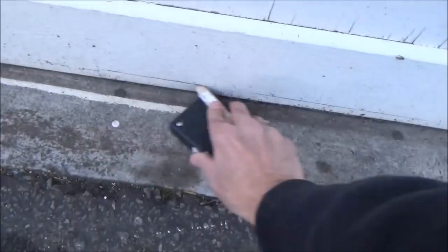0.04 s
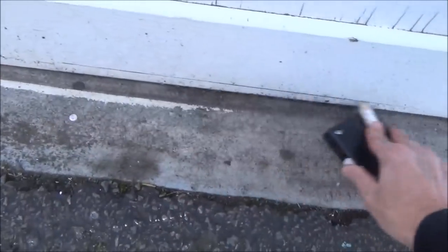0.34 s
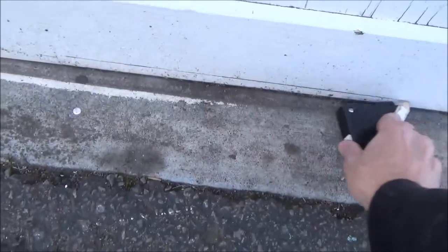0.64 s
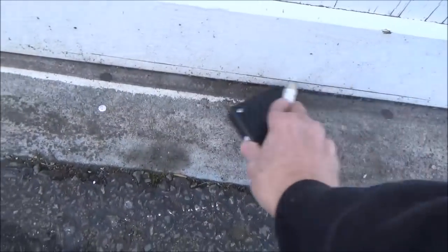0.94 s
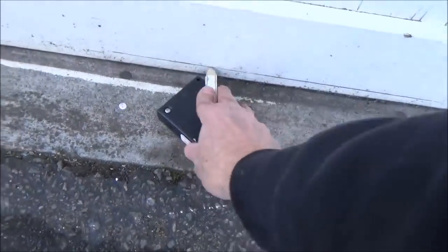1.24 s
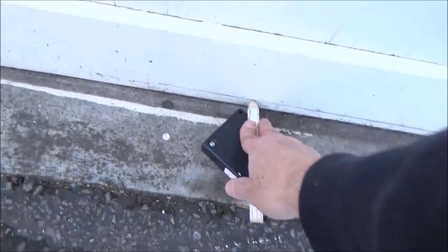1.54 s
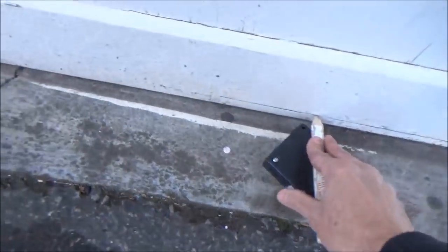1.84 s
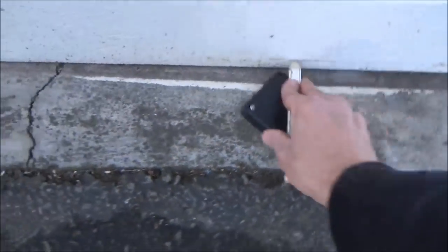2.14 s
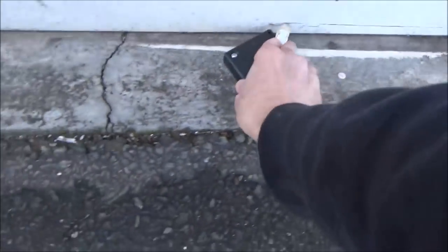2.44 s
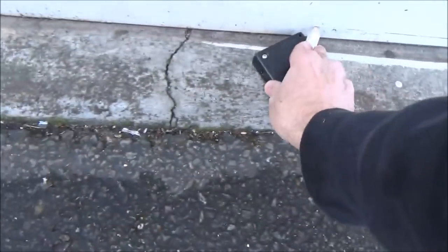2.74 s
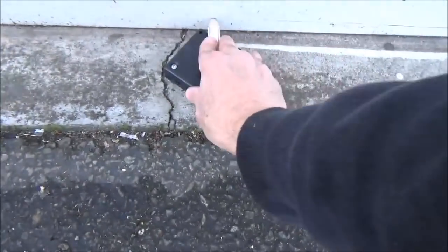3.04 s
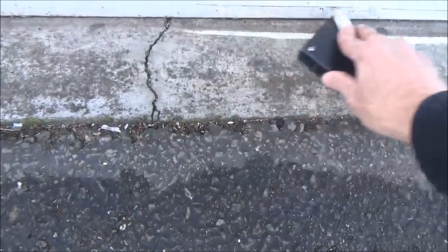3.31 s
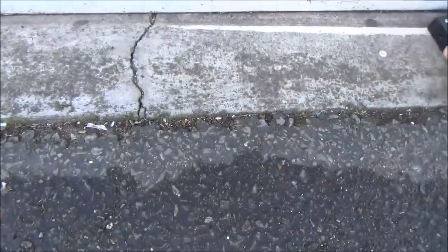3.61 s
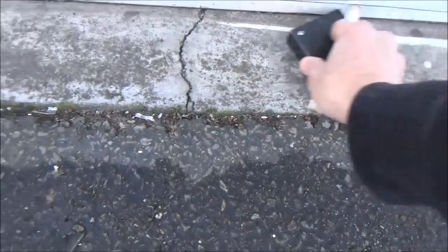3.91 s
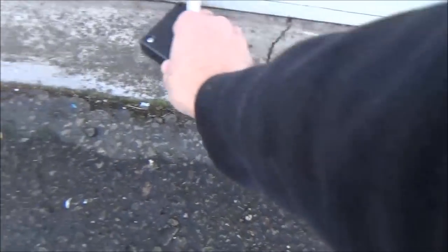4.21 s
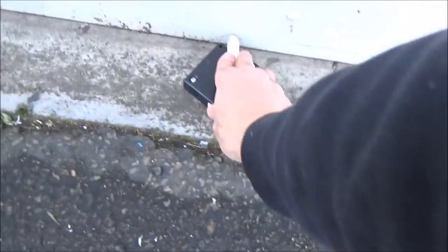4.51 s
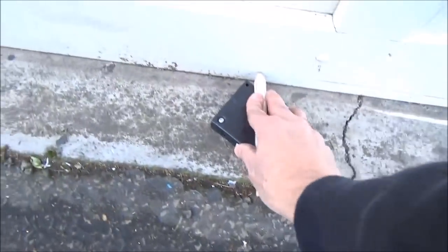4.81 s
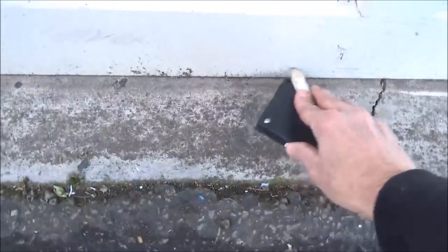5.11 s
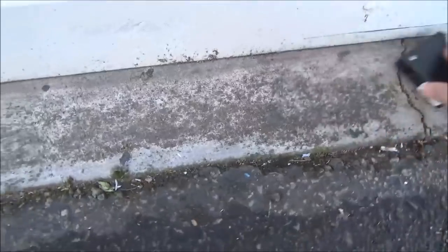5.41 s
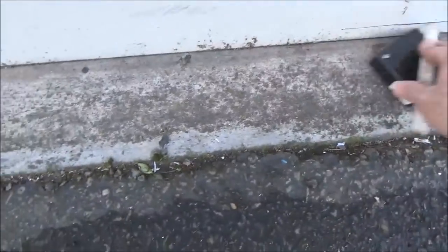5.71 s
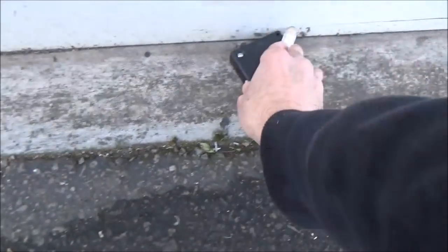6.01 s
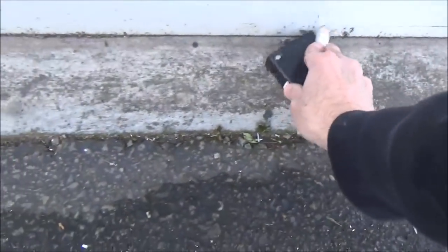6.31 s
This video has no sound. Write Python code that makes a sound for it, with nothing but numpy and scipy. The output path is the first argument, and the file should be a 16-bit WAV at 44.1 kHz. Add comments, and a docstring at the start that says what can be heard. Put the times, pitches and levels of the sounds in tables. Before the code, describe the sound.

Gritty scrapes of plastic on concrete move left and right, with small knocks and hoarse squeaks, over street rumble and a passing engine.

```python
"""A hollow plastic case, a pencil held against it, is dragged to and fro over rough concrete.
It slides left and right before a stereo microphone, at the foot of a garage door that reflects it.
Sand grains catch its edge and ring the case; at the turns it rocks, knocks and crunches loose grit.
Farther off, the street outside rumbles, and an engine swells and fades around the first long pause."""
import sys
import numpy as np
from scipy import signal
from scipy.fft import rfft, irfft, next_fast_len
from scipy.io import wavfile

SR = 44100
rng = np.random.default_rng(int(sys.argv[2]) if len(sys.argv) > 2 else 0)


def transcribe(u):
    """Save the signal u as a 16-bit wav file named by the first command-line argument.

    u: samples, shape (n,) or (channels, n), limited to [-1, 1]; the rate is SR.
    q: integer samples, one column per channel.
    """
    v = np.clip(np.atleast_2d(u).T, -1, 1)
    q = np.round(v * 32767).astype(np.int16)
    wavfile.write(sys.argv[1], SR, q)


N = 280035
TIME = np.arange(N) / SR


def amp(db):
    """Decibels to gain."""
    return 10 ** (np.asarray(db) / 20)


def unit_rms(x):
    """Scales to rms 1."""
    return x / np.sqrt(np.mean(x ** 2) + 1e-20)


def gain_at(spectrum, hz):
    """Gain of a (frequency [Hz], level [dB]) curve, joined on a log axis."""
    corners, db = np.transpose(spectrum)
    return amp(np.interp(np.log(hz + 1), np.log(corners + 1), db))


def add(mix, s, sound):
    """Mixes a sound in at time s."""
    part = mix[..., max(round(s * SR), 0):][..., :sound.shape[-1]]
    part += sound[..., :part.shape[-1]]


def wander(hz):
    """Slow random drift of rms 1, up to about hz."""
    step = 64
    count = next_fast_len(N // step + 2)
    f = np.fft.rfftfreq(count, step / SR)
    slow = irfft(rfft(rng.standard_normal(count)) / (1 + (f / hz) ** 4), count)
    return unit_rms(np.interp(np.arange(N) / step, np.arange(count), slow))


def hump(s, half_width):
    """A bell curve of height 1 around time s."""
    return np.exp(-np.minimum(((TIME - s) / half_width) ** 2, 20))


def resonate(x, hz, width):
    """A resonance of gain 1 that follows the pitch hz."""
    turn = np.exp(2j * np.pi * np.cumsum(hz * np.ones(len(x))) / SR)
    pole = np.exp(-np.pi * width / SR)
    return 2 * (turn * signal.lfilter([1 - pole], [1, -pole], x / turn + 1e-18)).real


def place():
    """Where the case is, seen from the microphone: positive is left."""
    # its path: (time [s], leftward position [dB])
    path = [(0.0, 2), (0.5, -5), (1.15, 0.5), (1.38, -4.5), (1.95, -2), (2.39, -1.5), (2.55, -2),
            (3.08, -0.5), (3.62, -6.5), (4.35, 1.5), (5, 0.5), (5.58, -6), (6.05, 1)]
    return np.interp(TIME, *np.transpose(path))


def hand(hollow_from_db=-2.5):
    """Each push speeds up, holds and slows; returns speed and the levels of (boom, rasp, fizz)."""
    # pushes and shifts of grip: (start [s], length [s], speeding up [s], slowing [s], edge rasp [dB],
    # swell over the push [dB], case boom re rasp [dB], sand fizz re rasp [dB])
    strokes = [(0.0, 0.48, 0.001, 0.12, -21.5, 1, -5.5, 1), (0.46, 0.079, 0.025, 0.031, -37, -1, 3.5, 2),
               (0.518, 0.19, 0.046, 0.14, -23.5, -0.5, 1, 4.5), (0.593, 0.53, 0.21, 0.042, -24.5, 2, 0, 1),
               (1.348, 0.089, 0.028, 0.044, -46, -3, 8.5, -4.0),
               (1.505, 0.19, 0.025, 0.159, -38.5, 5, 2, 0.5), (1.956, 0.24, 0.11, 0.11, -21.5, -2, -0.5, 3),
               (2.16, 0.3, 0.094, 0.2, -24, -5, -1.5, 1.5),
               (2.477, 0.56, 0.27, 0.14, -26.5, 9.5, -1.5, -0.0),
               (3.018, 0.69, 0.21, 0.203, -21.5, 1, -3.5, 1),
               (3.624, 0.72, 0.16, 0.12, -22, -0.5, -3, -1.5), (4.63, 0.16, 0.033, 0.087, -35.5, -3, 1, -2),
               (5.018, 0.548, 0.15, 0.088, -25.5, 4, -4, 4.0),
               (5.553, 0.51, 0.1, 0.083, -22.5, -3, -4.5, -0.5)]
    # the edge bites deeper (+) or skips (-): (time [s], half width [s], bite [dB])
    catches = [(0.038, 0.21, 2), (1.05, 0.047, 1), (2.792, 0.02, 4), (2.874, 0.04, 5), (3.452, 0.12, 0),
               (3.625, 0.026, -12.5), (4.178, 0.027, -8.5), (4.275, 0.016, 5.0), (5.154, 0.075, 5.5),
               (5.458, 0.044, 4)]
    # power of speed that each level follows: (boom, rasp, fizz)
    speed_power = (1.0, 1.67, 1.58)
    # response to a bite: (boom, rasp, fizz) [dB/dB]
    catch_share = (1.32, .86, -0.17)
    speeds, level = np.zeros(N), np.zeros((3, N))
    for start, length, rise, fall, db, swell_db, boom_db, fizz_db in strokes:
        t = np.arange(0, length, 1 / SR)
        speed = np.sin(np.pi / 2 * np.minimum(t / rise, 1))
        speed *= np.sin(np.pi / 2 * np.clip((length - t) / fall, 0, 1))
        pressure = amp(db + swell_db * (t / length - .5) + np.array([[boom_db], [0], [fizz_db]]))
        add(level, start, pressure * speed ** np.array(speed_power)[:, None])
        add(speeds, start, speed)
    bite_db = sum(db * hump(s, half) for s, half, db in catches)
    # far to the right the scrape turns hollow: more boom, less fizz
    hollow_db = np.outer((0.93, 0.05, -3.03), np.maximum(hollow_from_db - place(), 0))
    return speeds, level * amp(np.outer(catch_share, bite_db) + hollow_db)


def grains(per_s, spread_db):
    """Random sand impacts of mean power 1: many small, a few large, their size capped."""
    size = amp(spread_db * np.minimum(rng.exponential(1, N), 3.2)) * rng.choice([-1., 1.], N)
    hits = rng.random(N) < per_s / SR
    return unit_rms(size * hits / np.sqrt(per_s))


def scrape(level, grains_per_s=7000, shared=0.82):
    """Forces on the sliding edge as (boom, rasp, fizz); a slow edge meets fewer grains and crackles."""
    level = level * amp([[-1], [-.5], [0.5]])
    per_s = grains_per_s * np.clip(level[1] / amp(-25), .06, 1.5)
    common = grains(per_s, spread_db=4.5)
    separate = np.array([grains(per_s, spread_db=5.0) for _ in level])
    force = np.sqrt(shared) * common + np.sqrt(1 - shared) * separate
    # the case hops over the concrete; coarse stones shake its body, fine sand only the edge
    judder_db = 1.45 * wander(hz=58)
    band_judder_db = [1.72 * wander(hz=43.3), np.zeros(N), 0.58 * wander(hz=91)]
    return level * force * np.array([unit_rms(amp(judder_db + db)) for db in band_judder_db])


def contact(forces):
    """Plastic on concrete: each force sounds through a broad, minimum-phase response of unit energy."""
    # spectra of case boom, edge rasp and sand fizz: (frequency [Hz], relative level [dB])
    boom = [(60, -56), (150, -25), (250, -10.5), (350, 1), (560, -3.5), (800, -3.5), (1150, -3),
            (1500, -3.5), (2000, -14), (3500, -32)]
    rasp = [(500, -58), (1200, 6.5), (1900, 1), (2400, 4.5), (3000, 4.5), (3700, 3), (4200, -0.5),
            (5000, 2), (6100, -6), (7500, -21.5), (11000, -24.5)]
    fizz = [(2500, -83), (5500, -25.5), (6500, -3), (7400, 3), (8400, 5.5), (9400, 11), (10900, 11),
            (12500, -20.5)]
    hz = abs(np.fft.fftfreq(4096, 1 / SR))
    out = np.zeros(N)
    for force, spectrum in zip(forces, (boom, rasp, fizz)):
        log_gain = np.log(gain_at(spectrum, hz))
        response = np.fft.ifft(np.exp(signal.hilbert(log_gain).conj())).real
        out += signal.oaconvolve(force, response / np.linalg.norm(response))[:N]
    return out


def case_ring(rubbed, struck, shifting_db=8.0, bend=0.022):
    """Each mode swells and fades as the contact point moves, and bends with the pressure of the hand."""
    # modes of the shell: (frequency [Hz], width [Hz], gain rubbed [dB], gain struck [dB])
    modes = [(430.6, 11.3, -10.5, -34), (860, 33, -15, -1.5), (968, 77, -10, -50), (1415, 44, -48, -31),
             (2455, 100, -13, -12), (2770, 60, -20, -9), (3430, 1100, -8, -36), (4520, 52, -13, -14),
             (7260, 570, -35, -47), (9000, 180, -58, -14)]
    out = np.zeros(N)
    for hz, width, rub_db, hit_db in modes:
        band = np.searchsorted([1700, 6200], hz)  # boom, rasp or fizz
        coupling = unit_rms(amp(shifting_db * wander(hz=11)))
        drive = amp(rub_db) * coupling * rubbed[band] + amp(hit_db) * struck[band]
        pitch = hz * (1 + bend * wander(hz=2.4))
        out += resonate(drive, pitch, width) / np.sqrt(np.pi * width / SR)
    return out


def squawks(gain_db=-1, chatter_db=3.5, width_hz=460):
    """The edge sticks and slips, singing hoarsely; its pitch slides as the contact point moves."""
    # (start [s], end [s], start pitch [Hz], end pitch [Hz], level [dB])
    glides = [(0, 0.365, 1110, 1200, -27.5), (0.252, 0.444, 4800, 4800, -28),
              (0.682, 0.98, 3620, 3100, -29.5), (0.957, 1.106, 3260, 2680, -28),
              (0.904, 1.103, 4700, 4450, -35), (2.206, 2.36, 2440, 2490, -27),
              (3.706, 3.776, 935, 725, -22.5), (3.796, 3.864, 2140, 1180, -22),
              (3.873, 3.883, 940, 900, -17.5), (3.878, 3.97, 3800, 3500, -39), (5.38, 5.52, 1120, 940, -27),
              (5.894, 6.03, 2500, 2530, -30.5)]
    out = np.zeros(N)
    slips = rng.standard_normal(N) * amp(chatter_db * wander(hz=70))
    for start, end, from_hz, to_hz, db in glides:
        length = max(round((end - start) * SR), SR // 100)
        drive = slips[round(start * SR):][:length]
        hz = np.geomspace(from_hz, to_hz, len(drive))
        tone = unit_rms(resonate(resonate(drive, hz, width_hz), hz, width_hz))
        add(out, start, amp(gain_db + db) * tone * signal.windows.tukey(len(tone), .5))
    return out


def echoes(x, t60):
    """Dense reflections of unit energy, different in each channel."""
    t = np.arange(SR // 2) / SR
    taps = rng.standard_normal((2, len(t))) * amp(-60 * t / t60) * (t > .0005)
    taps /= np.linalg.norm(taps, axis=1, keepdims=True)
    return signal.oaconvolve(x[None], taps, axes=1)[:, :N]


def doorway(x, early_db=-9, tail_db=-30, changes_per_s=2.6):
    """Quick reflections off the nearby door and ground keep shifting; a faint tail follows."""
    travel = 2 * np.pi * changes_per_s * TIME
    phases = np.arange(4) * np.pi / 4
    early = sum(echoes(x * np.cos(travel + phase), t60=0.015) for phase in phases) / np.sqrt(2)
    return amp(early_db) * early + amp(tail_db) * echoes(x, t60=1.0)


def wash(spectrum, width, uneven_db=3.0):
    """Distant tyres and engines: dull, uneven noise, nearly alike in both channels."""
    colour = gain_at(spectrum, np.fft.rfftfreq(N, 1 / SR))
    mid, side = (unit_rms(irfft(rfft(rng.standard_normal(N)) * colour, N)) for _ in range(2))
    return amp(uneven_db * wander(hz=20)) * np.array([mid + width * side, mid - width * side])


def traffic(street_db=-46, nearest_s=1.87, near_for_s=1.55, passing_db=-35):
    """The steady street, its deep rumble, and one vehicle whose roar falls off with distance."""
    # spectra of street, rumble and vehicle: (frequency [Hz], relative level [dB])
    street = [(30, -41), (80, -33), (130, 1), (220, 0), (350, -5.5), (850, -10), (1300, -13.5), (1800, -16),
              (3000, -25.5), (4500, -29), (6300, -96), (11000, -110)]
    deep = [(20, -14), (45, -5.5), (75, -0.5), (125, 5), (180, -11), (300, -34)]
    roar = [(40, -38), (90, -7), (145, -2), (240, -4.5), (340, -6), (550, -9.5), (820, -2.5), (1100, -16.5),
            (2000, -25.5), (4500, -29.5), (6200, -36), (11000, -34.5)]
    # swells of the rumble: (time [s], half width [s], relative level [dB])
    swells = [(2.6, .17, -45), (3.479, 0.19, -45), (4.72, .35, -47), (6.2, .17, -54)]
    rumble = amp(-51.5) + sum(amp(db) * hump(s, half) for s, half, db in swells)
    distance = np.hypot(1, (TIME - nearest_s) / near_for_s)  # 1 at its nearest
    return (amp(street_db) * wash(street, width=0.19)
            + amp(3) * rumble * wash(deep, width=0.034)
            + amp(passing_db) / distance ** 1.8 * wash(roar, width=0.38))


def knocks(gain_db=-3, rise_s=0.0016, lead_s=.01):
    """The case tips and hits the ground on a short crunch of grains: forces as (boom, rasp, fizz)."""
    # (time [s], level [dB], boom re rasp [dB], fizz re rasp [dB], decay time [s])
    landings = [(0.441, -30, 15.5, -15, 0.0071), (0.493, -22, 6.5, 0, 0.0032), (1.389, -25.5, 8, -2, 0.011),
                (1.520, -25, 10.5, 0, 0.0054), (1.609, -19.5, 3.5, -11, 0.0032),
                (1.973, -17, -17, -9, .004), (4.535, -14.5, 0, -6, 0.009), (4.665, -32.5, 21.5, -3, 0.0062),
                (5.004, -19, -7.5, 6, 0.0097), (5.014, -20, -10, 7.5, 0.006), (5.605, -24, 7, -13, .006),
                (6.33, -18.5, -3, 5, 0.018)]
    force, t = np.zeros((3, N)), np.arange(SR // 10) / SR
    for s, db, boom_db, fizz_db, decay_s in landings:
        envelope = np.exp(np.minimum((t - lead_s) / rise_s, (lead_s - t) / decay_s))
        crunch = rng.standard_normal(len(t)) * envelope
        add(force, s - lead_s, amp(gain_db + db + np.array([[boom_db], [0], [fizz_db]])) * crunch)
    return force


def loose_grit(speed, rasp, per_s=20, over_rasp_db=1, scatter_db=7, bright_db=4):
    """Loose grit cracks at random while the edge is slow: extra rows for snaps()."""
    slow = (speed > .05) & (speed < .6)
    onsets = np.flatnonzero(slow & (rng.random(N) < per_s / SR))
    db = 20 * np.log10(rasp + 1e-9) + over_rasp_db + scatter_db * rng.standard_normal(N)
    return [(i / SR, db[i], bright_db) for i in onsets]


def snaps(loose, gain_db=7, decay_s=0.0015):
    """Single grains break under the edge: forces as (boom, rasp, fizz)."""
    # the coarsest grains: (time [s], level [dB], brightness [dB])
    coarse = [(0.51, -17.5, 0), (.699, -19.5, 11), (.736, -18, 6), (1.446, -20, -15), (1.589, -10.5, -7.5),
              (1.638, -16.5, -24.5), (2.160, -20, 6), (2.179, -20, 8.5), (2.336, -18, -4), (1.429, -29, -2),
              (2.648, -13, 3), (3.063, -10.5, -1), (3.072, -12, 3), (4.399, -21.5, -10), (4.851, -24.5, -5),
              (4.865, -19, -0.5), (5.079, -14.5, 5), (5.088, -17, 10), (6.018, -5, -8)]
    force, t = np.zeros((3, N)), np.arange(SR // 10) / SR
    splinters = rng.standard_normal(N + len(t))
    for s, db, bright_db in list(coarse) + loose:
        crack = splinters[round(s * SR):][:len(t)] * np.exp(-t / decay_s)
        bands = amp(gain_db + db + np.array([[-10], [0], [bright_db + 8]]))
        add(force, s, bands * crack / np.linalg.norm(crack))
    return force


def engine(firing_db=-35, firing_follows=0.6):
    """Out in the street an engine pulls slowly up and eases off; its second order booms in the exhaust."""
    # (time [s], firing rate [Hz], level [dB])
    revs = [(.95, 93.5, -47), (1.15, 94.7, -34.5), (1.55, 96.8, -30), (1.85, 97.8, -21), (2.2, 99.7, -27.5),
            (2.351, 98.2, -35), (2.45, 88.5, -46), (2.95, 80.7, -55)]
    # exhaust tones: (multiple of the firing rate, relative level [dB])
    orders = [(1.5, -18), (2, -1.5), (3, -21.5), (4, -29)]
    s, hz, db = np.transpose(revs)
    rate = np.interp(TIME, s, hz) * (1 + 0.001 * wander(hz=13))
    phase = 2 * np.pi * np.cumsum(rate) / SR
    level_db = np.interp(TIME, s, db)
    exhaust = sum(amp(level_db + order_db + .5 * wander(hz=6.3)) * np.sin(order * phase)
                  for order, order_db in orders)
    firing = amp(firing_db + firing_follows * (level_db - db.max()) + wander(hz=21)) * np.sin(phase)
    fade = np.interp(TIME, [s[0], s[1], s[-2], s[-1]], [0, 1, 1, 0])
    return np.sqrt(2) * (exhaust + firing) * fade


def bumps(rise_s=0.0003):
    """The hand sets the case down: dull, low tones that die at once."""
    # (time [s], level [dB], pitch [Hz], t60 [s])
    blows = [(4.543, -27.5, 425, 0.073), (4.6651, -13, 300, 0.017), (4.959, -20.5, 174, 0.025)]
    out, t = np.zeros(N), np.arange(SR // 5) / SR
    for s, db, hz, t60 in blows:
        envelope = amp(db - 60 * t / t60) * (1 - np.exp(-t / rise_s))
        add(out, s, 2 * envelope * np.sin(2 * np.pi * hz * t))
    return out


def scene(struck_db=-2, contact_db=-3, ring_db=-4.0, spread=0.8):
    """The case crosses to and fro in the foreground, with the street behind it."""
    speed, level = hand()
    rubbed = scrape(level)
    loose = loose_grit(speed, rasp=level[1])
    struck = amp(struck_db) * (knocks() + snaps(loose))
    case = amp(contact_db) * contact(rubbed + struck) + amp(ring_db) * case_ring(rubbed, struck)
    case += squawks() + bumps()
    pan_db = spread * place()
    street = traffic() * amp([[-.2], [.2]]) + engine() * amp([[-1.4], [1.2]])
    return (case + doorway(case)) * amp([pan_db / 2, -pan_db / 2]) + street


def record(dry):
    """The recorder cuts the top treble steeply."""
    lowpass = signal.firwin(801, cutoff=11080, window=("kaiser", 8), fs=SR)
    return signal.oaconvolve(dry, lowpass[None], "same")


dry = scene()
out = record(dry)
transcribe(out)
```